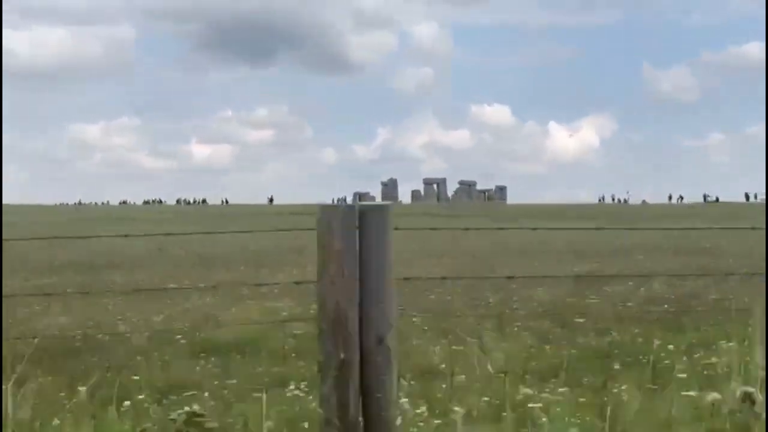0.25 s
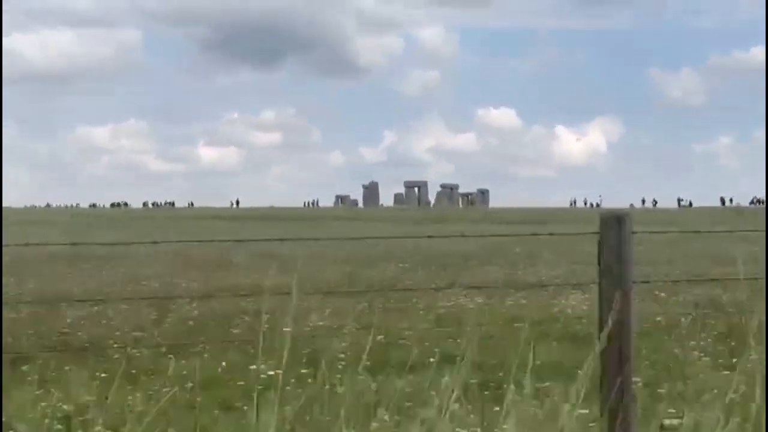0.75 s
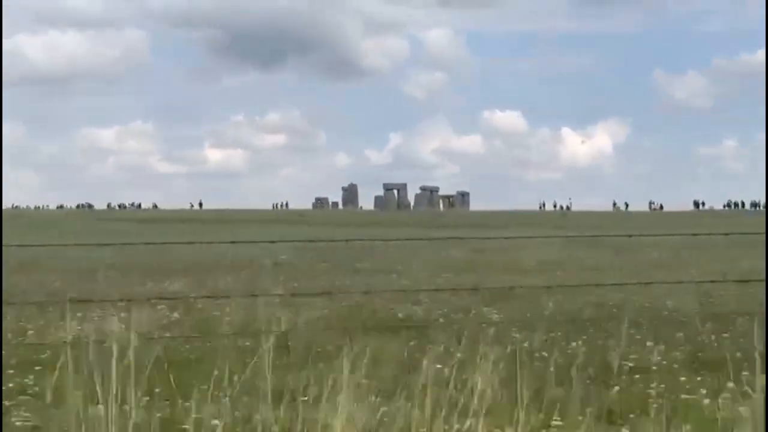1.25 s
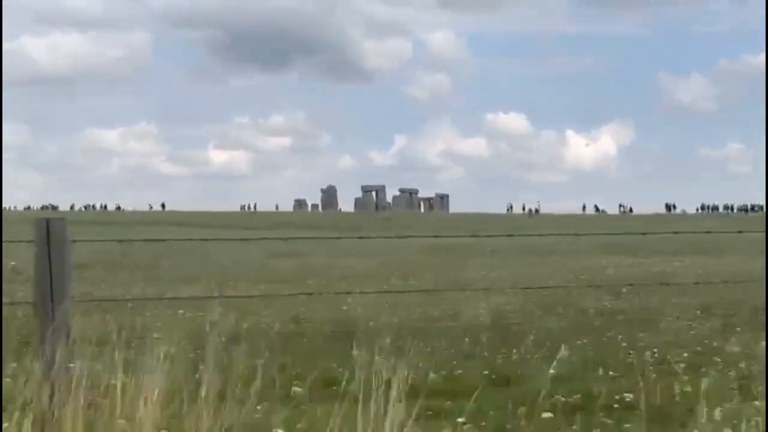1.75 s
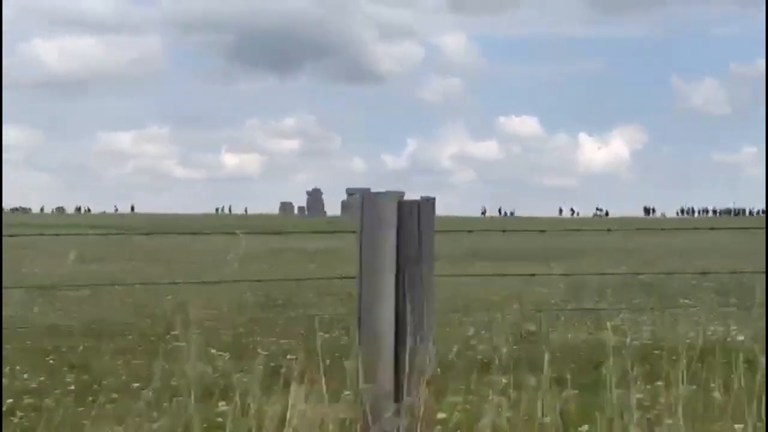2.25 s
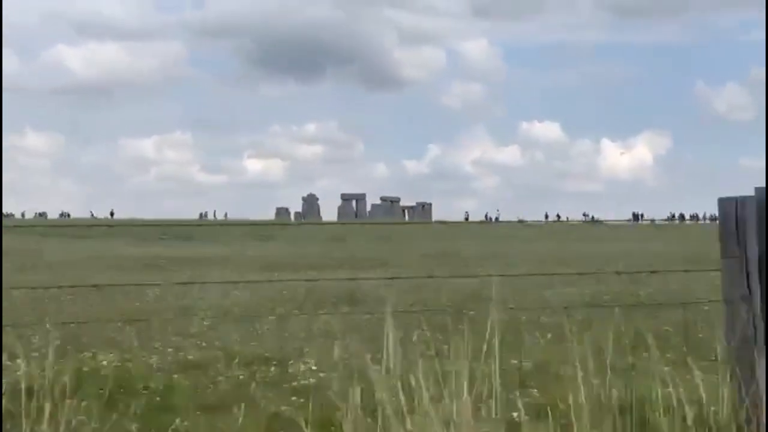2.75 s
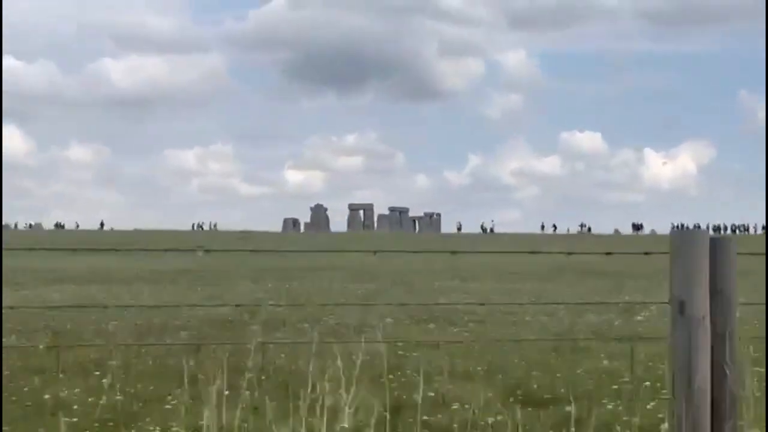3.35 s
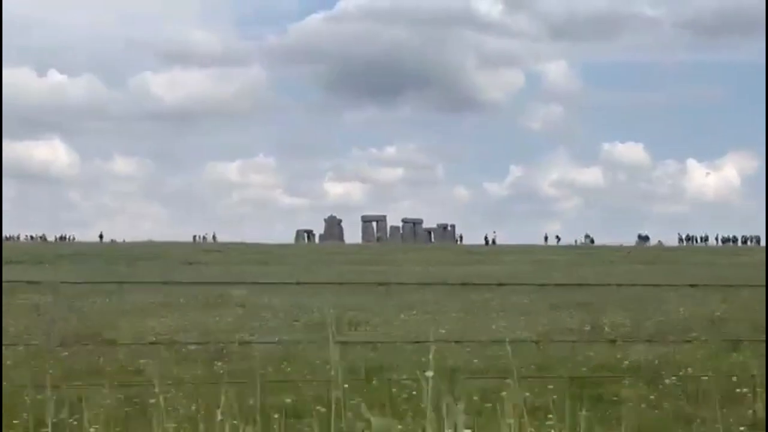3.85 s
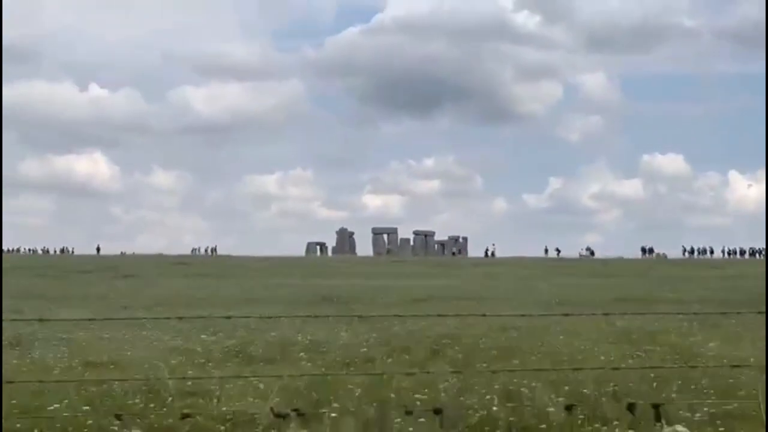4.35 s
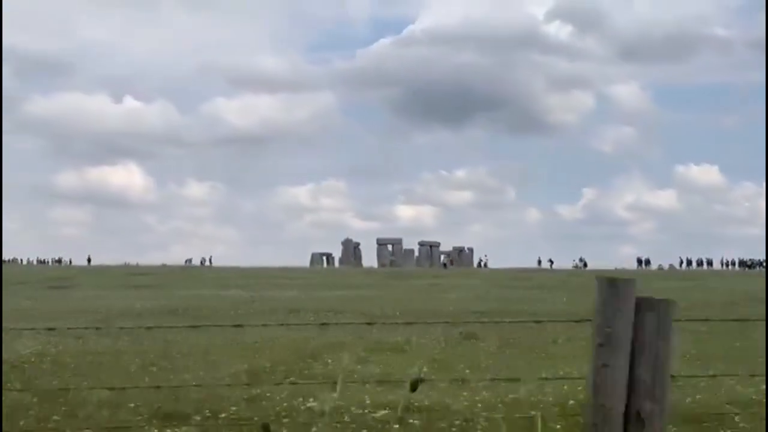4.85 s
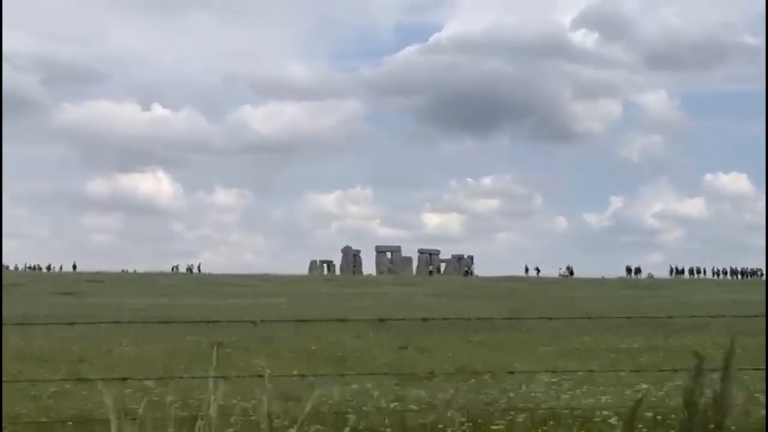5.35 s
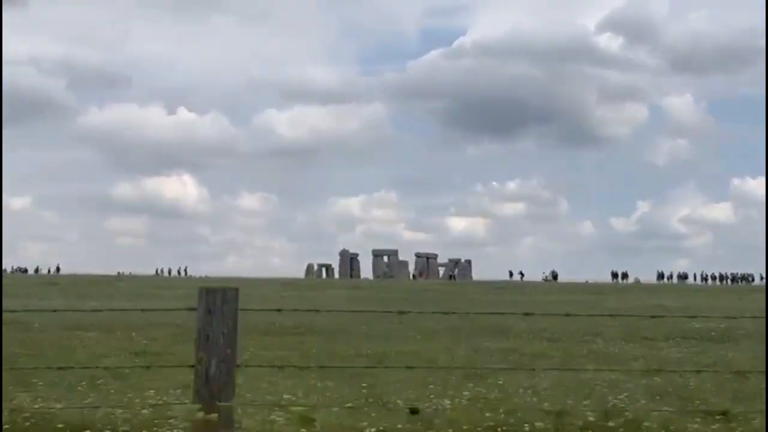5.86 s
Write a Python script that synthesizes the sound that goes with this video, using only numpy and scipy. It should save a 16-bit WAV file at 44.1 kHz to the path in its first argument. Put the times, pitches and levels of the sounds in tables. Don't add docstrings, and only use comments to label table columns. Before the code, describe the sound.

At the open window of a moving car passing a grassy field, wind strikes a close stereo microphone. Low rumble and dull thumps begin moderately, burst into violent buffeting with brittle snaps around two seconds, ease briefly, hit again at three, then return in heavy irregular blows to the end. Soft tyre roar stays steady underneath.

```python
import sys
import numpy as np
from scipy import signal
from scipy.fft import rfft, irfft, next_fast_len
from scipy.io import wavfile
from scipy.ndimage import uniform_filter1d, minimum_filter1d, map_coordinates

SR = 44100
rng = np.random.default_rng(int(sys.argv[2]) if len(sys.argv) > 2 else 0)


def output_pcm(signal):
    pcm = np.clip(np.atleast_2d(signal).T, -1, 1) * 32767
    wavfile.write(sys.argv[1], SR, np.round(pcm).astype(np.int16))


def magnitude_from_level(level_db):
    exponent = np.asarray(level_db, float) / 20
    return 10 ** exponent


N = 269010

# t/s, level/dB
WIND = [(0.0, -29), (0.17, -25.5), (0.78, -25), (0.93, -24.5), (1.56, -23.5), (2.09, -19.5), (2.23, -28.5),
        (2.53, -33.5), (3.04, -32), (3.57, -33.5), (3.99, -26.5), (4.16, -25), (4.42, -24), (4.69, -25.5),
        (5.08, -29.5), (5.27, -23), (6.01, -21), (6.1, -19)]
# t/s, level/dB, half length/s, brightness/dB
GUSTS = [(0.197, -23, 0.021, -12), (0.567, -28.5, 0.2, -0.5), (0.832, -27.5, 0.18, 1),
         (1.064, -19, 0.028, 2.5), (1.211, -37, 0.025, -8.5), (1.786, -16.5, 0.046, -3.5),
         (2.047, -16.5, 0.039, 0), (2.109, -17.5, 0.044, 1.5), (2.167, -21, 0.022, 2),
         (2.181, -11.5, 0.048, -4.5), (2.472, -29, 0.025, -13), (2.532, -23.5, 0.055, 1.5),
         (3.023, -21, 0.045, 4), (3.262, -25.5, 0.02, 1.5), (3.455, -22.5, 0.024, -8),
         (4.112, -11, 0.017, -21), (4.217, -17, 0.044, -19), (4.302, -16.5, 0.045, -7.5),
         (4.494, -24.5, 0.019, -17), (4.566, -15.5, 0.018, -10), (4.687, -27, 0.038, -10),
         (4.897, -10, 0.059, -11.5), (4.995, -20.5, 0.068, -0.5), (5.406, -20, 0.031, -5),
         (5.266, -28.5, 0.053, -12), (5.545, -15.5, 0.04, -12), (5.806, -18, 0.033, -14),
         (5.836, -17, 0.04, -0.5), (5.958, -12.5, 0.051, -8), (6.09, -14.5, 0.046, -19)]
CALM_DB = (-4, -9, -13.5)
CALM_GROWS = (0.85, 0.7, 0.33)
# t/s, peak/dB, body/dB
THUMPS = [(0.031, -18.5, -22), (0.822, -21, -16), (0.868, -19.5, 4), (0.924, -22.5, 6), (1.073, -25.5, -5),
          (1.2, -18, -10), (5.925, -20, -0.5), (1.785, -22, -9), (2.037, -12, -16), (2.0855, -6, -4),
          (2.114, -7, -10), (2.16, -4.5, -26), (2.189, -9, -28), (5.862, -12.5, -1), (2.456, -3.5, -20),
          (2.528, -20.5, -25), (2.601, -25.5, 9), (3.015, -12.5, -16.5), (3.032, -7.5, -15.5),
          (2.148, -15, -9), (3.045, -4, -12.5), (3.223, -25.5, 9), (3.261, -18, -14), (4.1, -16.5, -5),
          (4.305, -15, -9), (4.569, -14, 0.5), (4.65, -20.5, 3.5), (4.848, -24, 10), (4.883, -14, -12),
          (4.999, -14, -7), (5.542, -24.5, -10), (5.832, -9, -18.5)]
# t/s, peak/dB, body/dB
FLUTTERS = [(0.764, -23, -2), (0.781, -13.5, -7), (1.064, -20.5, -15), (1.082, -11.5, -15.5),
            (1.25, -14, -10.5), (1.697, -16.5, -12), (1.755, -19, -3.5), (2.019, -14.5, -13.5),
            (2.041, -5.5, -6), (2.091, -7.5, -20), (2.119, -14, -7), (2.176, -0.5, -11),
            (2.394, -13.5, -12), (2.468, -15, 0), (2.549, -18, -17), (2.696, -16, -11.5),
            (2.97, -20.5, 0.5), (3.02, -14.5, -4.5), (3.061, -23, -11), (3.445, -22, -7), (3.545, -20, -9),
            (3.915, -18, -15), (4.11, -20.5, 2.5), (4.208, -26, -2), (4.235, -19.5, 1.5), (4.33, -12, -9),
            (4.357, -18, -7), (4.378, -16, -8.5), (4.469, -28.5, 4), (4.533, -16.5, -0.5),
            (4.599, -21.5, 1), (4.674, -11.5, -3), (4.746, -19.5, -5), (4.895, -11, -18),
            (4.946, -21.5, -2.5), (4.979, -15, -12), (5.117, -17.5, -7), (5.25, -27, -11), (5.289, -17, -6),
            (5.4, -21.5, -7.5), (5.807, -19, 6), (5.825, -8, -9), (5.841, -4.5, -12), (5.882, -16.5, 5.5),
            (5.907, -21, 1.5), (5.953, -16, -6), (5.975, -24, 3), (5.992, -21, 9.5)]
# t/s, peak/dB
BLOWS = [(0.221, -16), (0.778, -19), (0.921, -30), (1.06, -13.5), (1.676, -22), (1.764, -21), (2.23, -14),
         (2.019, -8), (2.086, -5), (2.164, -13), (2.453, -6), (2.65, -17), (3.038, -10), (4.1, -7),
         (4.199, -11), (4.299, -11), (4.361, -9), (4.463, -6), (4.561, -5.5), (4.658, -12.5), (4.751, -12),
         (4.891, -11), (4.999, -17.5), (5.25, -13), (5.339, -19), (5.53, -7), (5.645, -14), (5.681, -9),
         (5.799, -7.5), (5.948, -6.5)]
# t/s, peak/dB
SNAPS = [(2.161, -33), (2.1788, -26.5), (2.1879, -18), (2.193, -33), (2.4557, -27.5), (2.6154, -38),
         (3.0205, -26.5), (3.0454, -24), (3.2613, -33), (4.9504, -35), (5.871, -25.5)]
# t/s, peak/dB
CRACKS = [
    (2.161, -29),
    (2.4566, -16.5),
]
# t/s, peak/dB
FLICKS = [(0.805, -22), (0.822, -16), (0.875, -18), (1.063, -18.5), (1.074, -14), (1.082, -14),
          (1.223, -30), (1.263, -30), (2.003, -27), (2.037, -13), (2.087, -5), (2.096, -8), (2.118, -12),
          (2.148, -16.5), (2.162, 0.5), (2.178, -13.5), (2.188, -4), (2.278, -31), (2.457, -5.5),
          (2.466, -12.5), (2.533, -20), (2.898, -21), (3.001, -14), (3.017, -7.5), (3.021, -16),
          (3.03, -6.5), (3.045, -4.5), (3.051, -9), (3.062, -14), (3.26, -12.5), (3.445, -28), (4.084, -18),
          (4.187, -19), (4.306, -23), (4.568, -27), (4.884, -22), (4.892, -15), (5.543, -13), (5.804, -19),
          (5.831, -20), (5.841, -12), (5.863, -25), (5.926, -28), (5.952, -27)]
# t/s, peak/dB
PUFFS = [(0.838, -15.5), (0.854, -19.5), (1.099, -22), (1.224, -21), (1.277, -21.5), (1.294, -23.5),
         (2.06, -18.5), (2.209, -23), (2.254, -25), (2.289, -29), (2.928, -25), (3.849, -23), (3.949, -28),
         (3.999, -26), (4.124, -20), (4.399, -25.5), (4.475, -27), (4.523, -18), (5.15, -24.5),
         (5.439, -27.5), (5.867, -11.5), (6.029, -28)]
# t/s, peak/dB, half length/s
SURGES = [(0.0, -21, 0.035), (0.225, -29, 0.14), (0.47, -23, 0.077), (0.845, -24, 0.14),
          (1.143, -26.5, 0.31), (1.437, -24, .2), (1.592, -22, 0.063), (1.771, -18, .1),
          (2.056, -23.5, 0.22), (2.211, -15, 0.093), (2.481, -19, 0.079), (2.634, -22, 0.15),
          (2.854, -27.5, 0.1), (3.053, -15, 0.073), (3.298, -25.5, 0.12), (3.687, -25.5, 0.12),
          (3.8, -28, 0.11), (4.021, -23.5, 0.11), (4.22, -24.5, 0.27), (4.396, -20, 0.25),
          (4.553, -20.5, 0.12), (4.71, -26, 0.16), (4.917, -23, 0.14), (3.497, -32, 0.22),
          (5.149, -22.5, 0.075), (5.275, -24, 0.077), (5.564, -18.5, 0.16), (5.744, -21.5, 0.17),
          (5.874, -10, 0.092), (6.026, -16.5, 0.27)]
# t/s, level/dB, road coarseness/dB
ROAR = [(0.0, -39, 0), (0.68, -41, 1), (1.2, -40, 3), (2.1, -39, 0.5), (2.6, -39, -1), (3.4, -38.5, -1),
        (4.3, -39, -1), (4.84, -38, -2), (6.1, -39, 0.5)]

# f/Hz, density/dB
LARGE_SPECTRUM = [(50, -24.5), (90, -2), (150, 1.5), (250, -1.5), (400, -12.5), (700, -53.5), (1500, -120)]
# f/Hz, density/dB
MIDDLING_SPECTRUM = [(100, -62.5), (220, -11), (350, -1.5), (500, -0.5), (700, -10.5), (1000, -19),
                     (3000, -120)]
# f/Hz, density/dB
SMALL_SPECTRUM = [(250, -64), (550, -3.5), (750, 0.5), (1050, -10), (1300, -19), (1600, -23), (2400, -53),
                  (4000, -74), (8000, -120)]
# f/Hz, density/dB
SNAP_SPECTRUM = [(700, -80), (1400, -20), (1800, 0), (2300, -3), (2900, -24), (6000, -60), (12000, -90)]
# f/Hz, density/dB
CRACK_SPECTRUM = [(700, -56), (1500, 5), (2200, -1), (3500, -12.5), (6000, -32), (12000, -50)]
# f/Hz, density/dB
THROB_SPECTRUM = [(15, -30), (28, -7), (40, -1), (52, 0), (64, 0), (80, -4), (120, -11), (200, -35),
                  (400, -120)]
# f/Hz, density/dB
TYRE_SPECTRUM = [(100, -5), (300, 5), (620, -2), (860, 3.5), (1300, 3), (1550, -.3), (1800, -1.7),
                 (2050, -5.5), (2300, -10), (4600, -17), (5700, -24), (7000, -28.5), (11550, -34.5),
                 (11950, -48)]
# f/Hz, width/Hz, level/dB
TREAD = [(865, 70, 5), (960, 80, -2), (1790, 130, 3.5)]
# f/Hz, level/dB
COARSE_SPECTRUM = [(250, -40), (450, 0), (1550, 0), (1700, -40)]
# f/Hz, depth/dB
PATCHY = [(3000, 1.22), (5500, 1.56), (7500, 2), (11000, 1.5)]

# f/Hz, likeness/1
WIND_ALIKE = [(60, 1), (400, 0.95), (1000, 0.9), (1800, 0.8)]
# f/Hz, likeness/1
TYRES_ALIKE = [(60, 0.99), (300, 0.75), (700, 0.34), (1100, 0.39), (1400, 0.63), (1600, 0.83), (1800, 0.55)]
# f/Hz, likeness/1
TREBLE_ALIKE = [(2100, .97), (2600, .997), (3800, 1), (5000, 1), (5800, .93), (7000, .95), (7900, .994),
                (9200, .994), (10000, .95), (10900, 1)]
# f/Hz, lead/rad
PORT_LEAD = [(40, 0), (170, .27), (700, .15), (1000, 0), (1250, -1.3), (1620, -3), (1660, -5.8),
             (2150, -2 * np.pi), (5900, -2 * np.pi), (6900, -2.3 * np.pi), (7600, -2.85 * np.pi),
             (8300, -3 * np.pi), (8900, -3 * np.pi), (9650, -3.22 * np.pi), (10350, -3.65 * np.pi),
             (10900, -4 * np.pi)]
# f/Hz, level/dB
PORT_BALANCE = [(500, .2), (800, 3), (1150, 5), (1380, 0), (1550, -4), (2000, -3.5), (2300, 0)]


def unit(x):
    return x / np.sqrt(np.mean(x ** 2) + 1e-20)


def along(points, hz):
    f, value = np.transpose(points)
    return np.interp(np.log(hz + 1), np.log(f + 1), value)


def curves(rows):
    s, *columns = np.transpose(rows)
    return [np.interp(np.arange(N) / SR, s, column) for column in columns]


def wobble(knots_hz):
    knots = rng.standard_normal(int(N * 60 / SR) + 4)
    return map_coordinates(knots, [np.arange(N) * min(knots_hz, 60) / SR])


def filtered(x, response):
    pad = 2048
    x = np.pad(x, [(0, 0)] * (x.ndim - 1) + [(pad, pad)], 'reflect')
    size = next_fast_len(x.shape[-1] + SR // 4)
    y = irfft(rfft(x, size) * response(np.fft.rfftfreq(size, 1 / SR)), size)
    return y[..., pad:x.shape[-1] - pad]


def coloured(x, spectrum):
    return filtered(x, lambda hz: magnitude_from_level(along(spectrum, hz)))


def evened(x, span_s, depth):
    power = np.abs(uniform_filter1d(unit(x)[0] ** 2, int(span_s * SR))) + .02
    return unit(x / power ** (np.clip(depth, 0, 1) / 2))


def at_ports(pair, alike):
    def mixing(hz):
        turn_rad = np.arccos(np.clip(along(alike + TREBLE_ALIKE, hz), -1, 1)) / 2
        return np.array([np.cos(turn_rad), np.sin(turn_rad)])

    mid, side = filtered(pair, mixing)
    return np.array([mid + side, mid - side])


def swept(x, cycles=1.691, knee_hz=60):
    return filtered(x, lambda hz: np.exp(-2j * np.pi * cycles * np.log(1 + hz / knee_hz)))


def swells(calm_db, s, peak_db, half_s, fall_db, tail):
    hop = 32
    off_s = np.arange(0, N + hop, hop) / SR - s[:, None]
    shape_db = -fall_db * np.maximum(-off_s, off_s / tail) / half_s[:, None]
    power = np.sum(magnitude_from_level(2 * (peak_db[:, None] + shape_db)), axis=0)
    swell_power = np.interp(np.arange(N) / hop, np.arange(len(power)), power)
    return 10 * np.log10(magnitude_from_level(2 * calm_db) + swell_power)


def calm(over_db, grows):
    wind_db, = curves(WIND)
    mean_db = wind_db.mean()
    return mean_db + over_db + grows * (wind_db - mean_db)


def chances(count):
    return rng.standard_normal((count, 3))


def pushes(count):
    luck = chances(count)
    return np.column_stack([-np.abs(luck[:, 0]), luck[:, 1:]])


def struck(s, level_db, spectrum, luck):
    at = np.round(s * SR).astype(int)
    late = np.round(30 * luck[:, 1]).astype(int)
    kicks = np.zeros((2, N + SR))
    kicks[0, at] = np.sign(luck[:, 0]) * magnitude_from_level(level_db)
    kicks[1, np.abs(at + late)] = luck[:, 2] * magnitude_from_level(level_db)
    probe = coloured(signal.unit_impulse(SR // 2, 'mid'), spectrum)
    return coloured(kicks[:, :N], spectrum) / np.abs(swept(probe)).max()


def gust_levels():
    s, db, half_s, bright_db = np.transpose(GUSTS)
    peaks_db = db, db + bright_db, db + 3.2 * bright_db - 4.5
    return [swells(calm(over_db, grows), s + 0.0037, peak_db, half_s, fall_db=21, tail=0.93)
            for over_db, grows, peak_db in zip(CALM_DB, CALM_GROWS, peaks_db)]


def eddies():
    large_db, middling_db, small_db = gust_levels()
    kicks_per_s, spread_db = 1300, 2.8
    luck = rng.random((2, N))
    size = rng.standard_normal((2, 2, N))
    kicks = swept((luck < kicks_per_s / SR) * size[0] * magnitude_from_level(spread_db * size[1]))
    flutter = wobble(35)
    large = evened(coloured(kicks, LARGE_SPECTRUM), span_s=0.083, depth=0.19)
    middling = evened(coloured(kicks, MIDDLING_SPECTRUM), span_s=0.0076, depth=0.67)
    small = evened(coloured(kicks, SMALL_SPECTRUM), span_s=0.023, depth=1.0)
    return (magnitude_from_level(large_db - 3.0 + 0.8 * flutter) * large
            + magnitude_from_level(middling_db - 7.5 + 3.75 * flutter) * middling
            + magnitude_from_level(small_db - 10 + 1.1 * flutter) * small)


def full_eddies(rows, chance, late_s, middling_db, large_db, small_db):
    s, db, body_db = np.transpose(rows)
    luck = chance(len(s))
    return (struck(s + late_s, db + middling_db, MIDDLING_SPECTRUM, luck)
            + struck(s + late_s, db + body_db + large_db, LARGE_SPECTRUM, luck)
            + struck(s + late_s, db + small_db, SMALL_SPECTRUM, luck))


def single_kicks(rows, chance, late_s, spectrum, over_db):
    s, db = np.transpose(rows)
    return struck(s + late_s, db + over_db, spectrum, chance(len(s)))


def thumps():
    strong = full_eddies(THUMPS, pushes, 0.0013, middling_db=-4.5, large_db=0.33, small_db=-11.5)
    lesser = full_eddies(FLUTTERS, chances, 0.0012, middling_db=-9.5, large_db=1.0, small_db=-25)
    blows = single_kicks(BLOWS, chances, -0.0021, LARGE_SPECTRUM, over_db=-5.5)
    snaps = single_kicks(SNAPS, chances, 0.00075, SNAP_SPECTRUM, over_db=-4.0)
    cracks = single_kicks(CRACKS, chances, 0.001, CRACK_SPECTRUM, over_db=-1.5)
    return swept(strong + lesser + blows + snaps + cracks)


def flicks():
    small = single_kicks(FLICKS, pushes, 0.001283, SMALL_SPECTRUM, over_db=-6.5)
    puffs = single_kicks(PUFFS, chances, 0.0012, MIDDLING_SPECTRUM, over_db=-5)
    return swept(small + puffs)


def throb():
    air = swept(coloured(rng.standard_normal((2, N)), THROB_SPECTRUM))
    s, peak_db, half_s = np.transpose(SURGES)
    level_db = swells(calm(-7.5, grows=0.76), s, peak_db, half_s, fall_db=13.5, tail=0.67)
    return magnitude_from_level(level_db + 1.1) * evened(air, span_s=0.083, depth=0.92)


def tread(hz):
    return magnitude_from_level(sum(db / (1 + (2 * (hz - at_hz) / wide_hz) ** 2) for at_hz, wide_hz, db in TREAD))


def patchy_noise():
    window = 512
    noise = signal.stft(rng.standard_normal((2, N)), nperseg=window)[2]
    field = uniform_filter1d(rng.standard_normal(noise.shape[1:]), size=6, axis=0)
    field = unit(uniform_filter1d(field, size=10, axis=1))
    depth_db = along(PATCHY, np.fft.rfftfreq(window, 1 / SR))[:, None]
    return signal.istft(noise * magnitude_from_level(depth_db * field), nperseg=window)[1][:, :N]


def tyres():
    roar_db, coarse_db = curves(ROAR)
    noise = filtered(coloured(patchy_noise(), TYRE_SPECTRUM), tread)
    roar = unit(at_ports(noise, TYRES_ALIKE))
    drone = (magnitude_from_level(coarse_db) - 1) * coloured(roar, COARSE_SPECTRUM)
    return magnitude_from_level(roar_db + 5.5) * (roar + drone)


def scene():
    wind = eddies() + thumps() + flicks() + throb()
    return at_ports(wind, WIND_ALIKE) + tyres()


def top_cut(x):
    return signal.sosfilt(signal.butter(12, 12920, fs=SR, output="sos"), x)


def record(dry):
    top_hz, low_cut_hz = 11990, 27
    ceiling, hold_s, fade_s = .95, .004, .008

    def ports(hz):
        half = magnitude_from_level(along(PORT_BALANCE, hz) / 2) * np.exp(.5j * along(PORT_LEAD, hz))
        band = (hz < top_hz) / (1 + (low_cut_hz / (hz + 1)) ** 6)
        return band * np.array([half, 1 / half])

    x = filtered(dry, ports)
    hold = int(hold_s * SR)
    gain = ceiling / np.maximum(np.abs(x).max(axis=0), ceiling)
    gain = uniform_filter1d(minimum_filter1d(gain, 3 * hold), hold)
    gain = uniform_filter1d(gain, hold)
    fade = np.clip(np.arange(N, 0, -1) / (fade_s * SR), .3, 1)
    return top_cut(x * fade * gain)


dry = scene()
out = record(dry)
output_pcm(out)
```